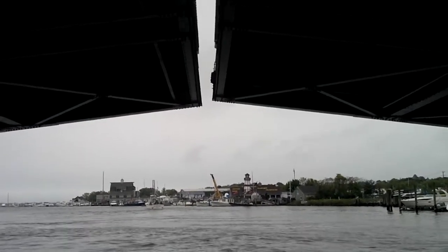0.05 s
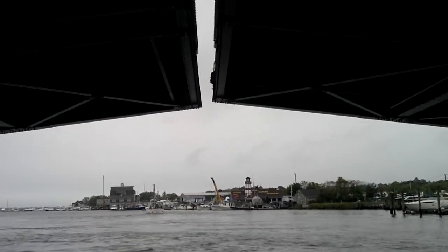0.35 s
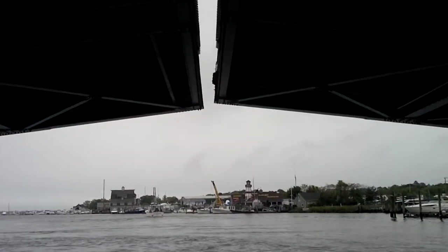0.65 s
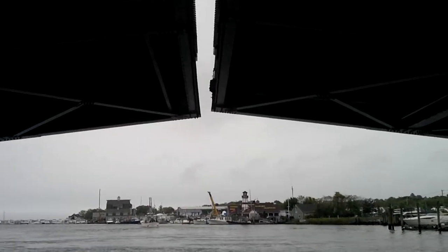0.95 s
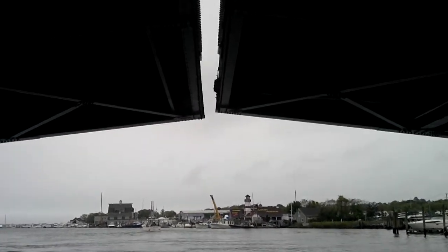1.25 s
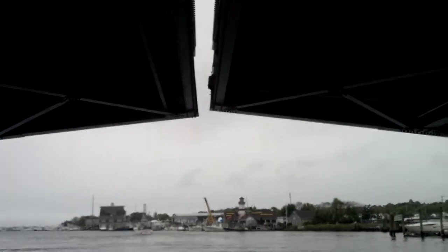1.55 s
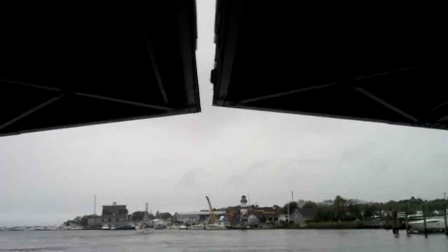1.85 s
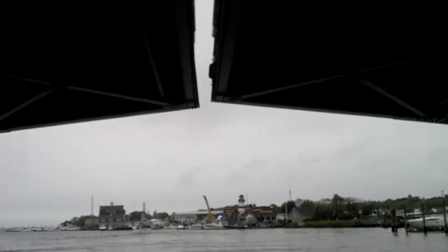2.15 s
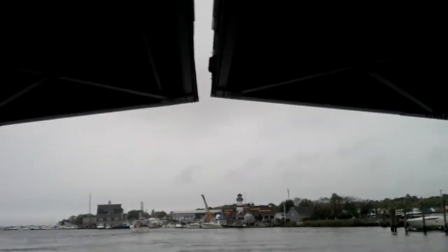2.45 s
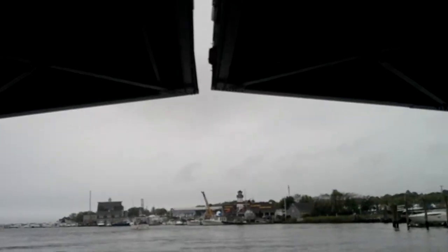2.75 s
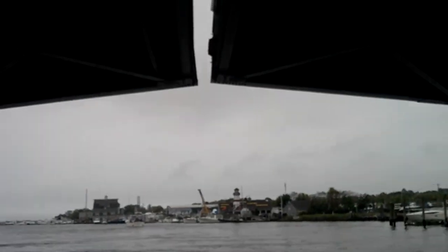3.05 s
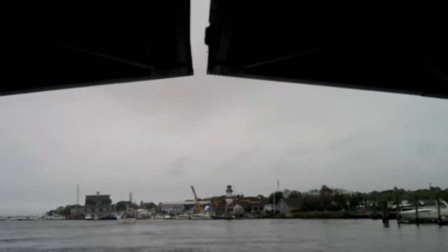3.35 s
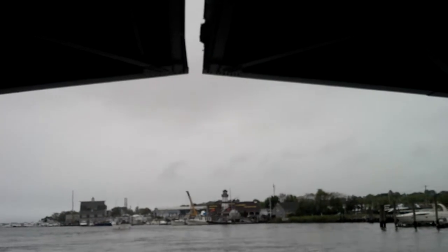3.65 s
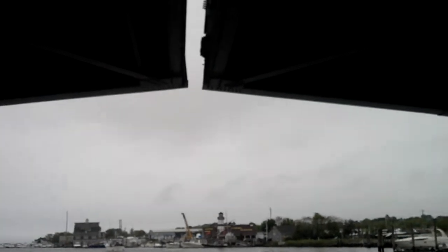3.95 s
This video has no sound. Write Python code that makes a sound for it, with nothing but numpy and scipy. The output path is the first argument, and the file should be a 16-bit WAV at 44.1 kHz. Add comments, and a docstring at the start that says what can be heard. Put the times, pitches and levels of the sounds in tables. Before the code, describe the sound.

A motor boat's engine drones under rushing water, with wind buffeting the microphone.

```python
"""A motor boat passes slowly under a drawbridge in a harbour, heard from the deck.
From the start the engine drones under rushing water, while gusts buffet the two ports of a small
stereo microphone and single eddies thump on one or the other. At 1.3 s the water surges and hisses
for a second and a half, with a thin whistle of wind. Waves bump the hull around 2 s. Near 2.9 s the
engine's whine swells and the hiss ducks at a loud thump; a last wave bumps at 3.6 s."""
import sys
import numpy as np
from scipy import signal
from scipy.fft import rfft, irfft
from scipy.io import wavfile

SR = 44100
rng = np.random.default_rng(int(sys.argv[2]) if len(sys.argv) > 2 else 0)


def pcm_store(signal):
    """Save signal as 16-bit PCM."""
    levels = np.round(np.clip(np.atleast_2d(signal), -1, 1) * 32767)
    wavfile.write(sys.argv[1], SR, levels.astype(np.int16).T)


N = 176400
TIME, FREQ = np.arange(N) / SR, np.fft.rfftfreq(N, 1 / SR)

# spectral lines of the engine: pitch_hz, level_db
ENGINE_LINES = [(97, -36), (129.3, -33.5), (195.5, -35.5), (360.5, -42.5)]
# rumble of engine and hull: frequency_hz, density_db
RUMBLE_SPECTRUM = [(20, -15.5), (55, -55), (90, -46), (130, -49.5), (190, -46.5), (280, -62), (500, -81),
                   (1000, -72), (3000, -115)]
# course of the engine's whine: time_s, pitch_hz, level_db
WHINE_TRACK = [(0, 566, -53.5), (1.4, 569, -46), (2.1, 560, -43.5), (2.85, 558, -35), (3.15, 560, -49.5),
               (4, 568, -44)]
# rushing water: frequency_hz, density_db
RUSH_SPECTRUM = [(60, -91), (170, -56), (300, -55), (480, -62), (570, -62), (720, -67), (860, -65),
                 (1150, -80), (1700, -77.5), (2600, -93), (6000, -110), (12000, -128)]
# loudness of the rush: time_s, gain_db
RUSH_ENVELOPE = [(0, -9.5), (.45, -7), (1, -5.5), (1.24, -3), (1.31, 3), (1.45, 4.5), (1.65, 2),
                 (1.85, 0.5), (2.1, 0.5), (2.35, 0), (2.85, 0), (3, -5.5), (3.5, -2), (3.75, -2), (4, -1.5)]
# hiss of the spray: frequency_hz, density_db
SPRAY_SPECTRUM = [(300, -113), (900, -74.5), (1500, -71), (1950, -71.5), (2300, -75.5), (2600, -93.5),
                  (2850, -81.5), (3300, -85), (4500, -84.5), (5500, -85), (7100, -83.5), (8500, -86.5),
                  (10000, -100), (12500, -105), (15500, -117)]
# loudness of the hiss, which ducks at the loud thump near 2.9 s and slowly recovers: time_s, gain_db
HISS_ENVELOPE = [(0, -7), (.25, -10.5), (.45, -7), (.7, -7.5), (.9, -4), (1.25, -5), (1.45, -0.5),
                 (1.85, -1), (2.15, 1.5), (2.45, -2), (2.7, 1.5), (2.85, 1), (2.91, -5), (3.1, -4.5),
                 (3.25, -2.5), (3.75, -1.5), (4, -1.5)]
# gusts on the microphone: centre_s, half_length_s, level_db
GUSTS = [(0.041, 0.02, -23), (0.115, 0.0066, -24), (0.207, 0.038, -26.5), (0.48, 0.0078, -15.5),
         (0.51, 0.029, -22), (0.568, 0.019, -13.5), (0.647, 0.016, -25), (1.388, 0.023, -20),
         (1.49, 0.036, -16.5), (2.042, 0.025, -22), (2.111, 0.014, -14), (2.16, 0.013, -16.5),
         (2.727, 0.0063, -19), (2.786, 0.012, -19), (2.84, 0.026, -24), (2.892, 0.018, -13.5),
         (2.961, 0.011, -19), (3.065, 0.016, -25), (3.238, 0.028, -17.5), (3.33, 0.023, -21),
         (3.622, 0.036, -17.5), (3.743, 0.041, -24.5), (3.932, 0.032, -26)]
# turbulent pressure at a port: frequency_hz, relative_density_db
BUFFET_SPECTRUM = [(20, 4), (55, -17), (105, 0.5), (190, -2), (320, -11.5), (550, -19), (900, -47),
                   (1500, -40), (3000, -107)]
# single eddies: centre_s, peak_db, pitch_hz, port (0 left, 1 right)
EDDIES = [(.04, -16, 376, 0), (.216, -20.5, 447, 0), (.664, -18, 397, 0), (0.5242, -4, 493, 0),
          (0.5433, -8, 437, 0), (0.5471, -5, 520, 0), (0.5633, -14, 400, 0), (0.5836, -9, 457, 0),
          (0.587, -5.5, 250, 0), (0.8219, -8.5, 216, 1), (1.479, -10, 442, 0), (2.114, -3.5, 222, 0),
          (2.1195, -5.5, 443, 0), (2.877, -3, 280, 0), (2.8868, -4.5, 345, 0), (2.8935, -16, 480, 0),
          (2.964, -15, 395, 0), (3.587, -8.5, 210, 0), (3.6144, -14.5, 485, 0), (3.617, -6.5, 188, 1)]
# strength of the wind whistle: time_s, gain_db
WHISTLE_ENVELOPE = [(0, -23), (1.25, -13), (1.4, 1.5), (1.62, 1.5), (1.75, -8), (1.92, -4), (2.3, -13),
                    (2.8, -8), (3, -33), (4, -28)]
# waves against the hull: start_s, level_db, tilt_db_per_octave
WAVE_BUMPS = [(1.973, -20, -19), (2.025, -7.5, -3), (2.215, -11.5, -16), (3.588, -12, -14)]
# normal modes of the hull: pitch_hz, t60_s
HULL_MODES = [(180, .13), (365, 0.066)]
# likeness of the two ports: frequency_hz, correlation (clipped to within -1..1 in use)
PORT_CORRELATION = [(60, 0.3), (150, 2.5), (300, 0.62), (600, 0.74), (1000, 0.42), (1300, 0.22),
                    (1600, -0.52), (2300, -0.14), (2650, 0.06), (3200, .15), (5000, 0), (7200, 0.1),
                    (9000, -0.12), (15000, 0)]
# left port against right: frequency_hz, gain_db
PORT_SHADOW = [(150, -3), (600, 0.5), (750, 1), (1300, -11), (1900, -6), (2900, 4), (5500, -7.5),
               (7100, -7), (9500, 1)]


def amp(db):
    """Amplitude ratio of a level in decibels."""
    return 10 ** (np.asarray(db) / 20)


def unit_rms(x):
    """Normalises a signal to unit mean power."""
    return x / np.sqrt(np.mean(x ** 2) + 1e-20)


def over_hz(points):
    """Interpolates a table along log frequency."""
    hz, value = np.transpose(points)
    return np.interp(np.log(FREQ + 1), np.log(hz + 1), value)


def over_time(points):
    """Interpolates a table along time."""
    return np.interp(TIME, *np.transpose(points))


def white():
    """Spectrum of white noise with unit power per Hz."""
    return rfft(rng.standard_normal(N)) * np.sqrt(SR / 2)


def drift(rate_hz):
    """Low-pass Gaussian noise: a random fluctuation of unit rms."""
    return unit_rms(irfft(white() * np.exp(-(FREQ / rate_hz) ** 2) * (FREQ > 0), N))


def at_ports(gain):
    """Partial coherence: airborne noise is partly alike at the two ports, the left one shadowed."""
    correlation = np.clip(over_hz(PORT_CORRELATION), -.995, .995)
    right = white()
    left = amp(over_hz(PORT_SHADOW)) * (correlation * right + np.sqrt(1 - correlation ** 2) * white())
    return irfft(np.array([left, right]) * gain, N)


def engine(waver=0.005, waver_hz=7.05, flutter_db=2.5, smear_cycles=0.07, smear_hz=10.2, left_db=-2.0):
    """Nearly periodic motion gives a line spectrum, here over the broadband rumble of the hull."""
    engine_time = np.cumsum(1 + waver * drift(waver_hz)) / SR  # all lines waver together
    lines = np.zeros(N)
    for hz, db in ENGINE_LINES:
        peak = np.sqrt(2) * amp(db + flutter_db * drift(waver_hz))
        cycles = hz * engine_time + rng.random() + smear_cycles * drift(smear_hz)
        lines += peak * np.sin(2 * np.pi * cycles)
    rumble = at_ports(amp(over_hz(RUMBLE_SPECTRUM)))
    # drone and rumble grow louder and softer along with the rush
    swell = amp(0.61 * over_time(RUSH_ENVELOPE))
    return (np.array([amp(left_db) * lines, lines]) + rumble) * swell


def whine(flutter_db=2.5, flutter_hz=9, smear_cycles=0.037):
    """Amplitude and phase modulation: one clearer engine tone drifts in pitch and comes and goes."""
    times, hz, db = np.transpose(WHINE_TRACK)
    cycles = np.cumsum(np.interp(TIME, times, hz)) / SR + rng.random() + smear_cycles * drift(flutter_hz)
    level_db = np.interp(TIME, times, db) + flutter_db * drift(flutter_hz)
    return amp(level_db) * np.sin(2 * np.pi * cycles)


def water(churn_db=0.83, churn_hz=22, flicker_db=0.83, flicker_hz=45):
    """Churning flow along the hull and its spray radiate broadband noise: a rush and a hiss."""
    rush = at_ports(amp(over_hz(RUSH_SPECTRUM)))
    rush *= amp(over_time(RUSH_ENVELOPE) + churn_db * drift(churn_hz))
    hiss = at_ports(amp(over_hz(SPRAY_SPECTRUM)))
    hiss *= amp(over_time(HISS_ENVELOPE) + flicker_db * drift(flicker_hz))
    return rush + hiss


def gusts(breeze_db=-37.5, swing_db=5, swing_hz=20, lee_port_db=-5):
    """Turbulent pressure is uncorrelated between the ports; gusts and a light breeze add in power."""
    gust_power = sum(amp(db) ** 2 * np.exp(-((TIME - centre_s) / half_s) ** 2)
                     for centre_s, half_s, db in GUSTS)
    breeze_power = amp(breeze_db + swing_db * drift(swing_hz)) ** 2
    left, right = (unit_rms(irfft(white() * amp(over_hz(BUFFET_SPECTRUM)), N)) for port in range(2))
    return np.array([left, amp(lee_port_db) * right]) * np.sqrt(gust_power + breeze_power)


def eddies(sharpness=3.62, flutter_db=-12, flutter_ratio=0.904, flutter_half_s=0.0083):
    """An eddy's pressure pulls, pushes and pulls on one port; quick pulses pop, slow ones thump."""
    out = np.zeros((2, N))
    wander_cycles = 0.098 * drift(rate_hz=92)
    for centre_s, db, hz, port in EDDIES:
        near = abs(TIME - centre_s) < .04
        t = TIME[near] - centre_s
        # the pulse's spectrum peaks at hz and narrows with sharpness
        pulse = ((1 - 2j * np.pi * hz * t / (sharpness - 1)) ** -sharpness).real
        # a short hollow flutter surrounds it
        cycles = flutter_ratio * hz * t + wander_cycles[near]
        flutter = np.exp(-(t / flutter_half_s) ** 2) * np.sin(2 * np.pi * cycles)
        out[port, near] += amp(db) * (pulse + amp(flutter_db) * flutter)
    return out


def whistle(pitch_hz=2012, width_hz=54, level_db=-43.5):
    """Resonance: wind excites one narrow band of noise, heard as a fuzzy tone."""
    resonance = 1 / (1 + (2 * (FREQ - pitch_hz) / width_hz) ** 2)
    return unit_rms(at_ports(resonance)) * amp(level_db + over_time(WHISTLE_ENVELOPE))


def wave_bumps(rise_s=0.0079):
    """Damped free vibration: each wave nudges the hull, whose modes boom and decay exponentially."""
    out = np.zeros(N)
    lowest_hz = HULL_MODES[0][0]
    for start_s, db, tilt_db in WAVE_BUMPS:
        t = np.maximum(TIME - start_s, 0)
        onset = 1 - np.exp(-(t / rise_s) ** 2)
        for hz, t60_s in HULL_MODES:
            level_db = db + tilt_db * np.log2(hz / lowest_hz)
            out += amp(level_db - 60 * t / t60_s) * onset * np.sin(2 * np.pi * hz * t)
    return out


def scene():
    """Superposition: the pressures of all sources add at the left and right ports."""
    return engine() + whine() + water() + gusts() + eddies() + whistle() + wave_bumps()


def record(dry):
    """Interference widens the stereo image: each channel subtracts the delayed opposite port."""
    delay_s, low_cut_hz, band_limit_hz = 1 / 2628, 81, 15700
    ports = rfft(dry * signal.windows.tukey(N, .002))
    wide = irfft(ports - ports[::-1] * np.exp(-2j * np.pi * FREQ * delay_s), N)
    highpass = signal.butter(3, low_cut_hz, "highpass", fs=SR, output="sos")
    lowpass = signal.firwin(511, band_limit_hz, window=("kaiser", 9), fs=SR)
    return signal.oaconvolve(signal.sosfilt(highpass, wide), lowpass[None], "same")


dry = scene()
out = record(dry)
pcm_store(out)
```